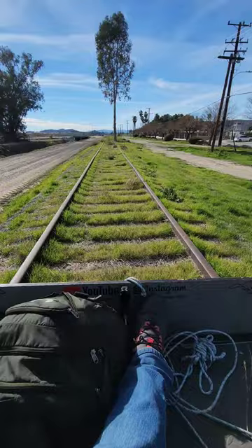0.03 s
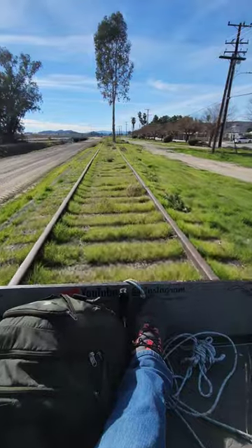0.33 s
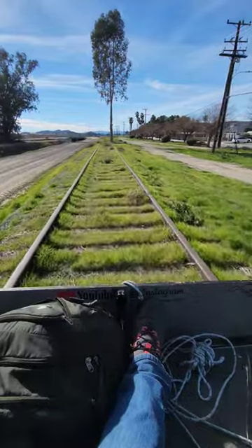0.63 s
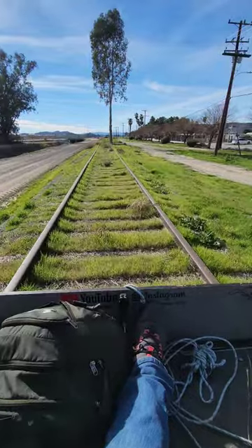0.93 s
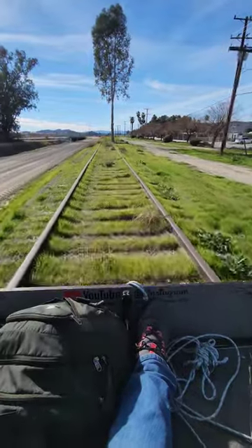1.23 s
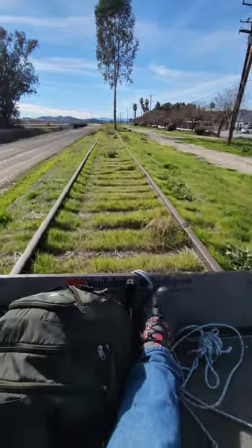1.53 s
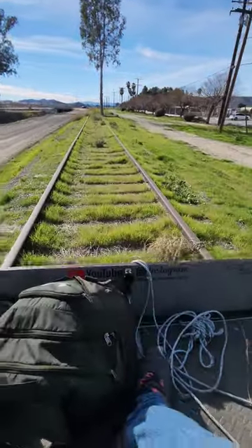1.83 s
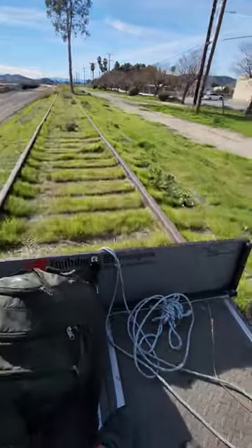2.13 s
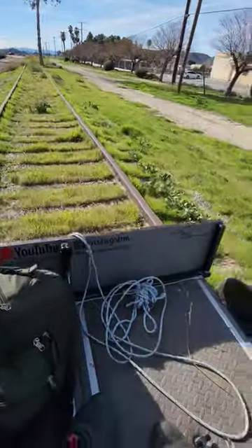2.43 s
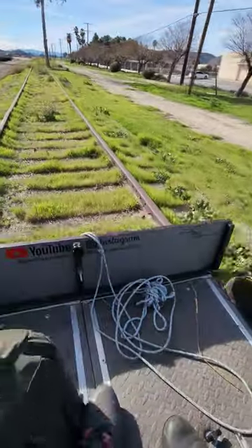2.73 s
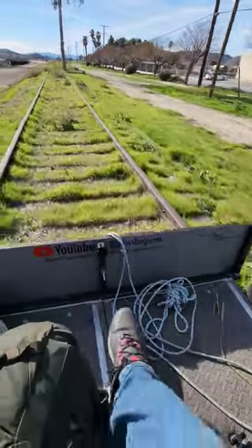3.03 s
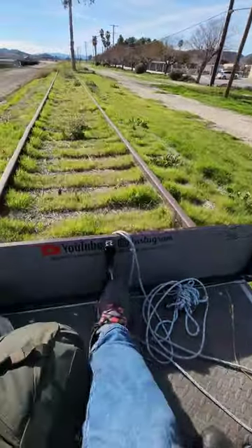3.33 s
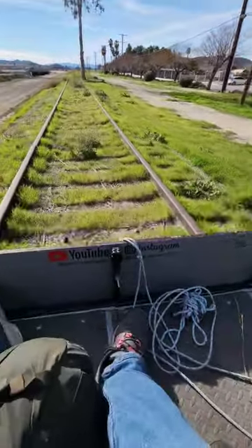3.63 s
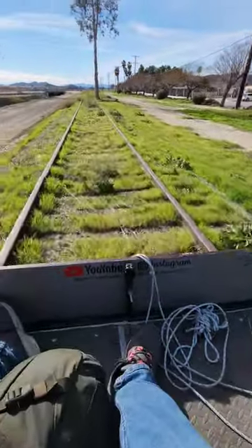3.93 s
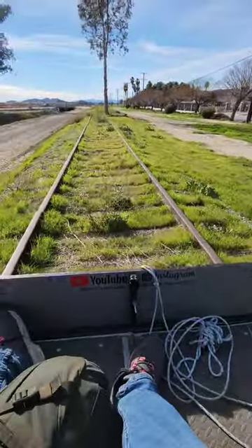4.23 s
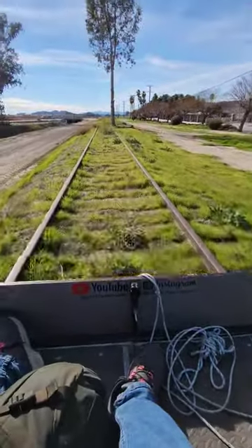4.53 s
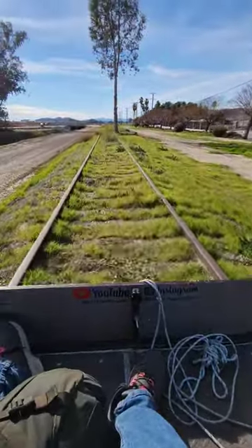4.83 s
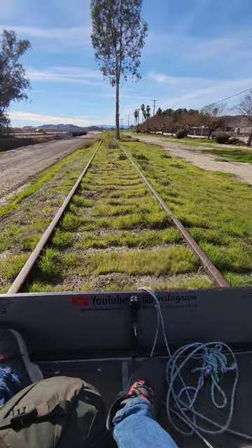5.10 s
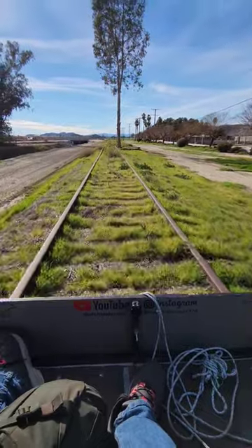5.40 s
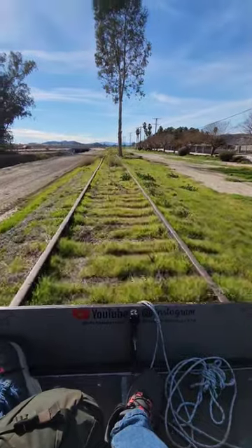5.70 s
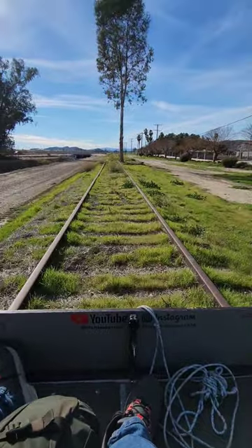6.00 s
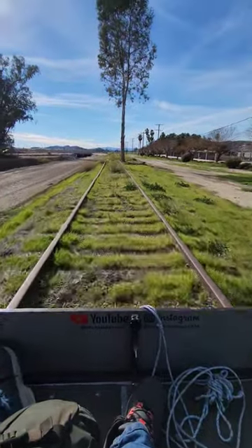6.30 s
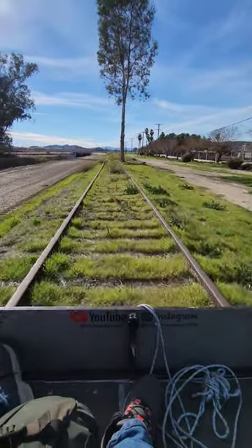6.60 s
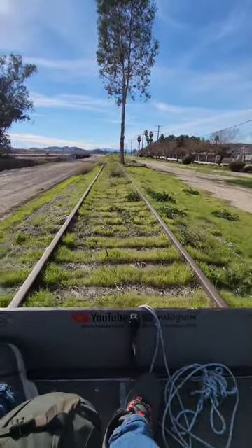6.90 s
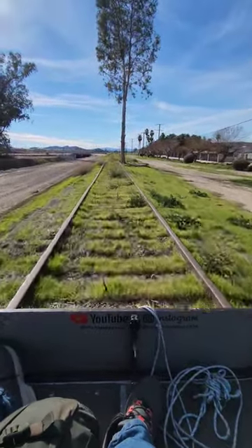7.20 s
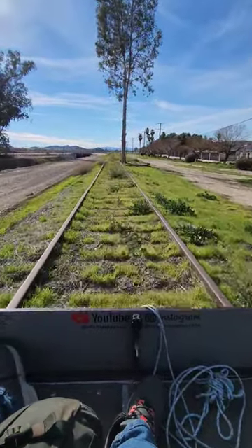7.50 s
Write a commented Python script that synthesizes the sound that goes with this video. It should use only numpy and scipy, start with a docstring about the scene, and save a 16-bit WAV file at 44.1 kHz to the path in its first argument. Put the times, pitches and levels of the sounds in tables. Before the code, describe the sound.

At about 0.2 seconds the sound cuts in on a small motorised cart rolling along rusty rails outdoors, heard from its deck. A low, boxy rumble and rough wheel roar continue throughout, juddering about fifteen times a second, with faint steel ringing. Rattling knocks cluster in the first half second. A loud, sharp metal knock lands at 2.5 seconds, after which the rolling is a little softer, with scattered light knocks and faint swishing weeds. Thin, faint wheel squeals flicker from 3.5 seconds until a hollow steel clonk at 5.2 seconds. The wheels then crunch into dirt, with another hard knock at 5.8 seconds and a run of snapping stalks and rattles. The gritty crunch peaks around 6.2 seconds as plants brush the underside, then eases while the cart rolls on to about 7.5 seconds.

```python
"""Cart on an overgrown railway

A small motorised cart rolls along the track, heard from its deck; the sound cuts in abruptly.
The wheels judder on rusty rails about 15 times a second, so the deck booms and the steel sings faintly.
Blows knock the frame, a hollow steel member clonks once, stalks whip the underside and snap,
and the wheels crunch through a drift of dirt."""
import sys
import numpy as np
from scipy.fft import rfft, irfft, next_fast_len
from scipy.io import wavfile
from scipy.ndimage import map_coordinates

SR = 44100
rng = np.random.default_rng(int(sys.argv[2]) if len(sys.argv) > 2 else 0)


def file_out(sig):
    """Save sig as 16-bit WAV at sys.argv[1]."""
    # one column per channel
    cols = np.atleast_2d(sig).T
    # limit, then scale
    lim = np.clip(cols, -1, 1)
    pcm = np.round(lim * 32767).astype(np.int16)
    wavfile.write(sys.argv[1], SR, pcm)


N = 332955
START_S = 0.2095

# pace of the wheel judder (time [s], rate [Hz])
JUDDER_RATE = [(0.2, 16.71), (0.6, 15.77), (1.0, 14.62), (1.5, 15.24), (2.0, 15.26), (2.5, 14.6),
               (3.0, 14.8), (3.5, 14.84), (4.0, 14.75), (4.5, 12.85), (5.0, 15.37), (5.4, 12.13),
               (5.8, 14.08), (6.1, 17.8), (6.5, 14.74), (7.0, 12.39), (7.55, 13.73)]
# swing of the wheel load (time [s], depth [dB])
JUDDER_DEPTH = [(0.55, 3.0), (1, 2.3), (3.8, 2.2), (4.3, 1.2), (5, 1.3), (5.3, 3.0), (5.9, 3.7),
                (6.35, 1.0)]
# the rail starts rough, then smooths out (time [s], roughness [dB])
RAIL_ROUGHNESS = [(0.21, 7), (0.52, 2.5), (0.68, 0.5), (2.48, 0), (2.6, -3.5), (3.7, -2.5), (4.25, -4.5),
                  (4.9, -4.5), (5.15, -3), (7.1, -6), (7.55, -6)]
# short stretches where the rolling grows rougher (middle [s], length [s], extra roughness [dB])
ROUGH_STRETCHES = [(3.04, 0.18, 1.5), (3.348, 0.14, 1), (3.903, 0.34, 2.5), (4.557, 0.45, 1.5),
                   (4.823, 0.18, 2), (4.98, 0.15, 2)]
# the wheels run into a drift of dirt and out again (time [s], share of dirt [0-1])
DIRT_SHARE = [(0.2, 0.04), (4.9, 0.19), (5.7, 0.66), (6.05, 0.79), (6.2, 0.93), (6.31, 0.95), (6.45, 0.75),
              (7, 0.48), (7.55, 0.53)]
# how each layer follows the track (base level [dB], roughness slope [dB/dB], lift in full dirt [dB])
DRONE_LAW, ROAR_LAW, RIM_LAW = (-21, 0.98, 5.5), (-30, 1.0, 12.1), (-43.5, 1.4, 6.3)
GRIT_LAW, FIZZ_LAW = (-40.5, 1.54, 15.9), (-48.5, 2.8, 15)

# level of the deck boom over time (time [s], level [dB])
BOOM_LEVEL = [(0.25, -19), (0.55, -16.5), (2.4, -19), (2.6, -23), (3.5, -21), (4.15, -20), (5.5, -21.5),
              (5.95, -19), (6.85, -20.5), (7.15, -23.5), (7.55, -21.5)]
# low boom of the deck (frequency [Hz], level [dB])
BOOM_SPECTRUM = [(12, -32), (25, -17), (45, -10.5), (75, -4.5), (120, -3), (165, -4.5), (210, -12),
                 (280, -28), (500, -76)]
# boxy drone of the side panels (frequency [Hz], level [dB])
DRONE_SPECTRUM = [(120, -30), (190, -2), (235, -0.5), (290, 1.5), (340, -2.5), (378, -3.5), (430, -15.5),
                  (560, -18), (1000, -70)]
# bass swells in the rumble and higher hollow hums (middle [s], length [s], relative level [dB], pitch [Hz])
SWELLS_AND_HUMS = [(0.24, 0.14, -21, 350), (1.4, 1.8, -28.5, 298), (2.1, 0.5, -28, 45),
                   (1.98, 0.4, -26, 349), (2.38, 0.16, -20, 73), (3.02, 0.14, -23, 305),
                   (3.17, 0.3, -26, 155), (3.22, 0.12, -25, 305), (3.41, 0.14, -23, 295),
                   (3.6, 0.2, -22, 262), (4.3, 0.3, -24.5, 247), (4.48, 0.2, -22, 153),
                   (4.66, 0.32, -22, 292), (5.06, 0.42, -25, 290), (5.17, 0.14, -22, 167),
                   (5.27, 0.4, -26, 46), (5.35, 0.4, -26, 75), (7.083, 0.3, -22, 234),
                   (7.23, 0.24, -25, 263)]
# midrange roar of wheels on rust (frequency [Hz], level [dB])
RUST_SPECTRUM = [(250, -41), (420, 1), (560, -2.5), (640, -2.5), (880, -5), (1100, -6), (1450, -7),
                 (1850, -10.5), (2100, -12.5), (2450, -12.5), (2800, -17.5), (4500, -40)]
# darker crunch of wheels in dirt (frequency [Hz], level [dB])
CRUNCH_SPECTRUM = [(200, -27), (370, 8.5), (480, -3), (620, -1), (820, -6.5), (1150, -13.5), (1500, -17),
                   (2300, -23), (3000, -24), (5000, -67)]
# bright rasp of crushed grit (frequency [Hz], level [dB])
GRIT_SPECTRUM = [(1200, 3.5), (2500, -4), (3200, 3.5), (4200, 2.5), (5600, -0.5), (6600, 0), (7500, 0.5),
                 (8400, -2.5), (9100, -13.5), (10800, -11), (12600, -9.5), (14000, -12), (15600, -15)]
# fizz on top of the grit (frequency [Hz], level [dB])
FIZZ_SPECTRUM = [(8000, -22), (10800, -6), (12600, -1), (14000, -4), (15600, -6)]
# resonances of the chassis (frequency [Hz], width [Hz], boost [dB])
CHASSIS_MODES = [(530, 40, 3.5), (720, 106, 3.5), (853, 25, 5.5), (1023, 150, 1), (1380, 59, 5.5),
                 (1532, 52, 5), (1655, 28, 5), (2330, 69, 5)]

# blows on the frame; thud, rattle and upper modes are relative to the blow
# (time [s], level [dB], ring pitch [Hz], thud [dB], thud pitch [Hz], rattle [dB], upper modes [dB])
FRAME_KNOCKS = [(0.210, -18, 840, 11, 340, -4, 3), (0.246, -18, 840, 6, 340, 2, 4),
                (0.311, -21, 900, 2, 340, -1, 3), (0.326, -24, 840, 0, 340, 1, 5),
                (0.381, -25, 840, 5, 340, -1, 3), (0.446, -24, 900, 2, 340, 0, 4),
                (0.512, -25, 840, 5, 340, 0, 5), (0.569, -21, 860, 7, 340, -3, 0),
                (0.578, -17, 820, 3, 340, -5, 3), (2.09, -21, 840, 1, 340, -3, 3),
                (2.376, -30, 700, 23, 270, -6, 0), (2.482, -5.5, 800, 4, 340, -14, 4),
                (3.023, -26, 900, 6, 330, -1, 8), (3.086, -19.5, 700, -2, 310, -10, 0),
                (3.242, -27, 1100, 0, 300, -3, 6), (3.337, -24, 1080, -2, 300, -9, 8),
                (3.376, -24, 1050, 8, 300, -3, 6), (3.519, -25, 900, 0, 320, -6, 4),
                (3.915, -27, 790, 3, 340, -3, 5), (4.056, -23, 760, 5, 380, -6, 2),
                (4.18, -28, 720, 3, 310, -6, 0), (4.497, -23.5, 700, 7, 440, -8, 0),
                (4.796, -22, 720, 1, 300, -9, 0), (4.989, -25, 720, -5, 340, -1, 5),
                (5.008, -23, 600, 3, 290, -6, 0), (5.257, -22, 1000, -14, 340, -12, -5),
                (5.508, -26, 780, -1, 340, 0, 3), (5.588, -24, 780, -3, 340, 0, 3),
                (5.654, -27, 780, 0, 340, -4, 0), (5.694, -29, 700, 14, 350, -6, 0),
                (5.731, -25, 780, 0, 340, 0, 2), (5.817, -12, 790, 2, 340, -9, 1),
                (5.829, -16, 800, 0, 340, -4, 4), (5.95, -22, 790, 5, 440, -3, 0),
                (6.001, -24, 620, 0, 340, -4, 0), (6.113, -19, 620, 3, 360, -2, 2),
                (6.167, -17, 840, 10, 390, -5, 0), (6.215, -19, 600, 2, 390, -4, 0),
                (6.254, -23, 720, 8, 400, -5, 0), (6.3, -20, 840, 9, 390, -4, 0),
                (6.459, -24, 680, 11, 400, -7, 0), (6.857, -24, 720, 0, 340, -6, 0),
                (7.266, -29, 760, 15, 400, -7, 0)]
# ring of the frame (multiple of the ring pitch [ratio], level [dB], t60 [s])
FRAME_MODES = [(1, 0, .04), (1.14, -10, .045), (1.35, -10.5, .05), (3.2, -28, .05), (2.1, -24, .05),
               (4.5, -31, .04)]
# ring of the hollow steel member (frequency [Hz], level [dB], t60 [s])
TUBE_MODES = [(688, 1.5, .045), (775, -6, .035), (1420, -19, .04), (1604, -25, .08), (2050, -16, .045),
              (2230, -19, .04), (3230, -28, .05), (4300, -32, .05)]
# crack of the blow on that member (frequency [Hz], level [dB])
CRACK_SPECTRUM = [(700, -12), (1400, -4), (2200, 0), (3300, -4), (5000, -11), (9000, -30)]
# stalks and stones snap (time [s], relative level [dB], t60 [s], tick against crackle [dB])
SNAP_EVENTS = [(2.408, -35, 0.06, 5), (2.482, -28, 0.04, -6), (2.488, -29, 0.045, -14),
               (3.47, -37, .05, -12), (3.6, -36, 0.041, -12), (3.874, -34, .04, -8),
               (5.135, -31.5, 0.047, -8), (5.2, -35, 0.15, -2), (5.2555, -25.5, 0.06, -3),
               (5.345, -37, .06, -8), (5.429, -33, 0.055, -8), (5.805, -30, .08, -3),
               (5.829, -28, 0.09, -10), (5.874, -26.5, 0.12, -4), (5.939, -31.5, 0.2, -4),
               (5.998, -34, 0.1, -8), (6.056, -28, 0.13, -3), (6.11, -31, .07, -8), (6.158, -27, 0.14, -7),
               (6.206, -28, 0.1, -6), (6.256, -31, 0.07, -8), (6.292, -24, 0.06, -8),
               (6.308, -27, 0.07, -10), (7.246, -36, 0.045, -6)]
# crackle of a snap (frequency [Hz], level [dB])
CRACKLE_SPECTRUM = [(400, -4), (1000, 21.5), (2000, -5), (3200, 6.5), (5500, 6), (7800, 4), (9500, -13.5),
                    (12500, 1.5), (15500, -19)]
# bright tick of a breaking stalk (frequency [Hz], level [dB])
TICK_SPECTRUM = [(3000, -30), (6000, 2), (9500, -6), (12500, -4), (15500, -1)]
# clumps of weeds brush the underside (middle [s], length [s], level [dB])
WEED_CLUMPS = [(2.8, 0.37, -50), (3.652, 1.96, -48.5), (6.235, 0.48, -39), (6.596, 0.9, -44)]
# swish of their stems (frequency [Hz], level [dB])
SWISH_SPECTRUM = [(1500, -22), (3000, -33), (4300, 2.5), (5200, -0.5), (5600, 7.5), (6100, 1), (7400, 3),
                  (8400, -6), (9200, -12), (12600, -1), (15500, -14)]
# ring of the wheel rims (frequency [Hz], width [Hz], level [dB])
RIM_MODES = [(1672, 30, 0), (2055, 110, 5.5), (3182, 45, -1.5), (4200, 70, -5), (4710, 70, -11),
             (5075, 70, -10), (5370, 80, -6), (6955, 70, -12), (7290, 130, -10)]
# a flange sings against the rail (middle [s], length [s], level [dB], pitch [Hz])
FLANGE_SQUEALS = [(3.64, 0.36, -60.5, 6960), (3.96, 0.2, -54.5, 4205), (4.17, 0.34, -54.5, 4205),
                  (4.457, 0.085, -52.5, 4205), (4.75, 0.5, -61, 4205), (5.112, 0.06, -53.5, 4205),
                  (5.175, 0.055, -49.5, 4205)]

# noise layers are narrow in the bass, wide on top (frequency [Hz], channel correlation [0-1])
STEREO_LIKENESS = [(50, 0.97), (130, 0.95), (350, 0.93), (550, 0.68), (1000, 0.58), (1500, 0.28),
                   (2300, 0.3), (4000, 0.16), (8000, 0.1)]
# balance across the spectrum (frequency [Hz], left minus right [dB])
STEREO_LEAN = [(60, 0), (280, -0.5), (520, -0.5), (800, 2.5), (1200, -0.3), (2200, -2), (5000, 0),
               (8000, -0.5), (12500, -2)]
# the treble drifts between the sides (time [s], lead of the right channel [s])
TREBLE_LEAD = [(1.7, 0.00003), (2.7, -0.00004), (4.15, -0.00003), (4.5, 0.00017)]


def judder(rebound=0.11, scatter_turns=0.03):
    """Wheel load in dB: one quick push per judder and a slower release, never twice the same."""
    rate_hz = curve(JUDDER_RATE) * (np.arange(N) > START_S * SR)
    turns = np.cumsum(rate_hz) / SR + scatter_turns * wobble(12)
    phase = 2 * np.pi * (turns - 0.11)
    push = np.cos(phase) + rebound * np.cos(2 * phase + np.pi / 4)
    uneven = 1 + 0.14 * wobble(10)
    jostle_db = 0.6 * wobble(55)
    return curve(JUDDER_DEPTH) * push * uneven + jostle_db


def deck(load_db, boom_grip=0.11, drone_grip=0.15, sway_db=1.5):
    """The rough rail shakes a boom from the deck and a swaying drone from its side panels."""
    boom = coloured(rng.standard_normal((2, N)), BOOM_SPECTRUM) * amp(boom_grip * load_db)
    drone = coloured(rng.standard_normal((2, N)), DRONE_SPECTRUM)
    drone *= amp(drone_grip * load_db + sway_db * wobble(7))
    return unit(boom) * amp(curve(BOOM_LEVEL)) + unit(drone) * track_gain(DRONE_LAW)


def swells_and_hums(trim_db=-1.0):
    """Low bass swells rise in the rumble, alongside higher, wavering hollow hums."""
    return amp(trim_db) * tones(SWELLS_AND_HUMS, waver_db=2.0, drift_rad=0.73, waver_hz=29)


def wheels(load_db, crunch_db=2.0, grit_grip=0.53):
    """Wheels roar on rust, crunch lower on dirt and crush grit to a fizz, hardest at peak load."""
    dirt = curve(DIRT_SHARE)
    chatter_db = 1.09 * wobble(110)
    rust = chassis(coloured(contacts(8000, spread_db=1), RUST_SPECTRUM) * amp(load_db + chatter_db))
    crunch = chassis(coloured(contacts(9000, spread_db=3), CRUNCH_SPECTRUM) * amp(load_db))
    roar = np.sqrt(1 - dirt) * rust + np.sqrt(dirt) * crunch * amp(crunch_db)
    grit = coloured(contacts(14000, spread_db=1), GRIT_SPECTRUM)
    grit *= amp(grit_grip * load_db + 1.38 * chatter_db)
    fizz = coloured(contacts(14000, spread_db=3), FIZZ_SPECTRUM)
    fizz *= amp(grit_grip * load_db + 1.27 * chatter_db)
    return (roar * track_gain(ROAR_LAW)
            + unit(grit) * track_gain(GRIT_LAW, max_rough_db=3)
            + unit(fizz) * track_gain(FIZZ_LAW, max_rough_db=1.8))


def knocks(attack_s=0.0017, thud_t60=0.073, rattle_t60=0.097, clank_db=-9):
    """Each blow rings the frame, thuds in the panels, rattles loose parts and clanks in the rims."""
    body, shake, t = np.zeros(N), np.zeros(N), np.arange(SR // 4) / SR
    multiple, mode_db, t60 = np.transpose(FRAME_MODES)[:, :, None]
    is_upper = np.arange(len(FRAME_MODES))[:, None] > 0
    for s, db, ring_hz, thud_db, thud_hz, rattle_db, upper_db in FRAME_KNOCKS:
        struck_db = mode_db + is_upper * upper_db + rng.normal(0, 1, mode_db.shape)
        ring = np.sum(decay(t, struck_db, t60) * np.sin(2 * np.pi * multiple * ring_hz * t), axis=0)
        thud = decay(t, thud_db, thud_t60) * np.sin(2 * np.pi * thud_hz * t)
        blow = amp(db) * (1 - np.exp(-(t / attack_s) ** 2))  # the contact builds up smoothly
        add(body, s, blow * (ring + thud))
        add(shake, s, blow * decay(t, rattle_db, rattle_t60))
    rattle = shake * chassis(chassis(coloured(rng.standard_normal((2, N)), RUST_SPECTRUM)))
    clank = amp(clank_db) * rim_ring(shake * rng.standard_normal(N))
    return body + rattle + clank


def clonk(at_s=5.1963, ring_db=1, attack_s=0.0033, crack_db=-20.5, crack_delay_s=0.003):
    """One hard blow rings a hollow steel member; the contact cracks just after the first touch."""
    body, crack, t = np.zeros(N), np.zeros(N), np.arange(SR // 4) / SR
    ring = sum(decay(t, db, t60) * np.sin(2 * np.pi * hz * t) for hz, db, t60 in TUBE_MODES)
    add(body, at_s, amp(ring_db) * ring * (1 - np.exp(-(t / attack_s) ** 2)))
    add(crack, at_s + crack_delay_s, decay(t, crack_db, t60=0.055) * (1 - np.exp(-t / 0.0007)))
    return body + crack * coloured(contacts(9000, spread_db=2), CRACK_SPECTRUM)


def snaps(trim_db=4.0, attack_s=0.0016, tick_t60=0.026):
    """Each stalk or stone breaks with a sharp, bright tick and a short burst of crackle."""
    bursts, spikes, t = np.zeros(N), np.zeros(N), np.arange(SR // 4) / SR
    for s, db, t60, tick_db in SNAP_EVENTS:
        add(bursts, s, decay(t, db, t60) * (1 - np.exp(-t / attack_s)))
        add(spikes, s, decay(t, db + tick_db, tick_t60))
    crackle = bursts * coloured(contacts(12000, spread_db=0), CRACKLE_SPECTRUM)
    ticks = spikes * coloured(contacts(9000, spread_db=2), TICK_SPECTRUM)
    return amp(trim_db) * (crackle + ticks)


def weeds(flutter_db=3.0):
    """Many stems rasp along the underside as the cart passes over a clump."""
    rasp = coloured(contacts(7000, spread_db=1), SWISH_SPECTRUM) * amp(flutter_db * wobble(70))
    return unit(rasp) * sum(amp(db) * swell(s, length) for s, length, db in WEED_CLUMPS)


def rims(load_db, mono_share=0.45, right_lean_db=5.5):
    """Grit keeps the steel rims ringing, off to the right."""
    centre = np.sqrt(mono_share) * rng.standard_normal(N)
    wide = np.sqrt(1 - mono_share) * rng.standard_normal((2, N))
    ring = unit(rim_ring((centre + wide) * amp(load_db)))
    return ring * track_gain(RIM_LAW) * amp([[-right_lean_db / 2], [right_lean_db / 2]])


def flange():
    """A flange rubs the rail in thin, flickering squeals."""
    return tones(FLANGE_SQUEALS, waver_db=3.3, drift_rad=0.9, waver_hz=70)


def chassis(x):
    """The metal frame lifts whatever it is fed at its own resonances; the result has rms 1."""
    boost_db = lambda f: sum(db / (1 + (2 * (f - hz) / width) ** 2) for hz, width, db in CHASSIS_MODES)
    return unit(filtered(x, lambda f: amp(boost_db(f))))


def rim_ring(x):
    """The steel rims ring at their modes; white noise keeps its power."""
    mode = lambda f, hz, width: 1j * f * width / (hz * hz - f * f + 1j * f * width)
    modes = lambda f: sum(amp(db) * mode(f, hz, width) for hz, width, db in RIM_MODES)
    return filtered(x, lambda f: modes(f) / np.sqrt(np.mean(np.abs(modes(f)) ** 2)))


def track_gain(law, max_rough_db=np.inf):
    """A layer grows louder with the roughness of the rail and with the square of the dirt."""
    base_db, slope, dirt_db = law
    patches_db = sum(db * swell(s, length) ** 2 for s, length, db in ROUGH_STRETCHES)
    rough_db = np.minimum(curve(RAIL_ROUGHNESS) + patches_db, max_rough_db)
    return amp(base_db + slope * rough_db + dirt_db * curve(DIRT_SHARE) ** 2)


def stereo_image(x, bass_lead_s=0.00022, split_hz=1500):
    """The bass from the deck arrives on the right first; the treble drifts between the sides."""
    side = np.array([[0.5], [-0.5]])
    x = filtered(x, lambda hz: amp(side * along(STEREO_LEAN, hz)))
    low = lambda hz: 1 / (1 + (hz / split_hz) ** 8)
    bass = filtered(x, lambda hz: low(hz) * np.exp(-2j * np.pi * hz * bass_lead_s * side))
    treble = filtered(x, lambda hz: 1 - low(hz))
    read_at = np.arange(N) - side * curve(TREBLE_LEAD) * SR
    return bass + np.array([map_coordinates(ch, [at], order=5) for ch, at in zip(treble, read_at)])


def tones(rows, waver_db, drift_rad, waver_hz):
    """Swelling tones whose level and phase waver at random."""
    t = np.arange(N) / SR
    waver, slip = amp(waver_db * wobble(waver_hz)), drift_rad * wobble(waver_hz)
    tone = lambda hz: unit(waver * np.sin(2 * np.pi * (hz * t + rng.random()) + slip))
    return sum(tone(hz) * amp(db) * swell(s, length) for s, length, db, hz in rows)


def contacts(rate, spread_db):
    """Tiny random impacts of uneven size, rate a second, reaching both channels."""
    hits = rng.random(N) < rate / SR
    return unit(hits * amp(spread_db * rng.standard_normal(N)) * rng.standard_normal((2, N)))


def coloured(pair, spectrum):
    """Shape two unrelated signals into a stereo texture of rms 1, near mono in the bass."""
    width = lambda hz: np.arccos(np.clip(along(STEREO_LIKENESS, hz), 0, 1)) / 2
    response = lambda hz: amp(along(spectrum, hz)) * [np.cos(width(hz)), np.sin(width(hz))]
    mid, side = filtered(pair, response)
    return unit(np.array([mid + side, mid - side]))


def filtered(x, response):
    """Filter x by a complex response of frequency."""
    size = next_fast_len(N + SR // 2)
    return irfft(rfft(x, size) * response(np.fft.rfftfreq(size, 1 / SR)), size)[..., :N]


def amp(db):
    """Decibels to gain."""
    return 10 ** (np.asarray(db) / 20)


def unit(x):
    """Scale to rms 1."""
    return x / np.sqrt(np.mean(x ** 2) + 1e-20)


def decay(t, db, t60):
    """An envelope that starts at db and falls 60 dB in t60 seconds."""
    return amp(db - 60 * t / t60)


def swell(middle, length):
    """A smooth rise from 0 to 1 and back."""
    return np.cos(np.pi * np.clip((np.arange(N) / SR - middle) / length, -0.5, 0.5))


def wobble(rate):
    """A smooth random curve, rate knots a second."""
    return map_coordinates(rng.standard_normal(int(N * rate / SR) + 4), [np.arange(N) * rate / SR])


def along(points, hz):
    """Read (frequency [Hz], value) points on a log axis."""
    freqs, values = np.transpose(points)
    return np.interp(np.log(hz + 1), np.log(freqs + 1), values)


def curve(points):
    """Join (time [s], value) points into an automation curve."""
    return np.interp(np.arange(N) / SR, *np.transpose(points))


def add(track, s, sound):
    """Mix a sound into a track at time s."""
    part = track[..., round(s * SR):][..., :sound.shape[-1]]
    part += sound[..., :part.shape[-1]]


def scene():
    """The judder drives the deck, the rims and the rolling noise; blows and plants come on top."""
    load_db = judder()
    rolling = deck(load_db) + swells_and_hums() + wheels(load_db) + rims(load_db) + flange()
    return stereo_image(rolling + weeds() + knocks() + clonk() + snaps())


def record(dry, fade_s=0.002, ceiling=0.96, top_hz=15700):
    """The sound cuts in from silence; the highest peaks are rounded off and the band is limited."""
    gate = np.clip((np.arange(N) / SR - START_S) / fade_s, 0, 1)
    rounded = dry / (1 + np.abs(dry / ceiling) ** 8) ** (1 / 8)
    return filtered(rounded * gate, lambda hz: 1 / (1 + (hz / top_hz) ** 200))


dry = scene()
out = record(dry)
file_out(out)
```